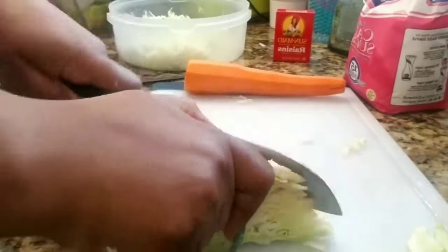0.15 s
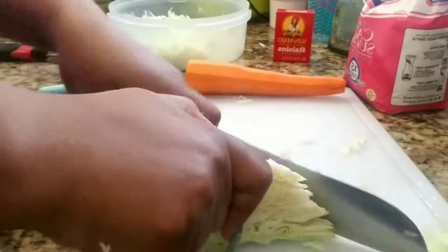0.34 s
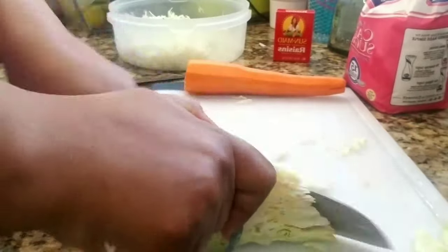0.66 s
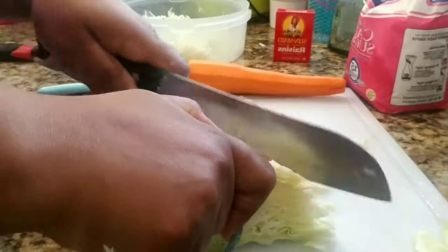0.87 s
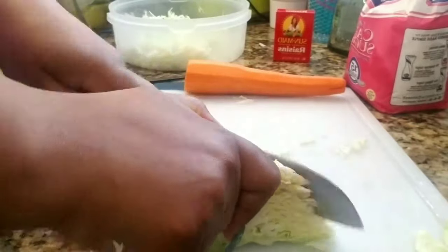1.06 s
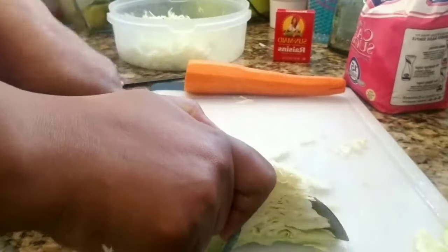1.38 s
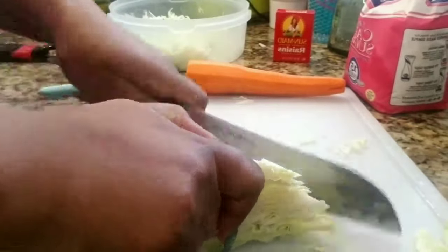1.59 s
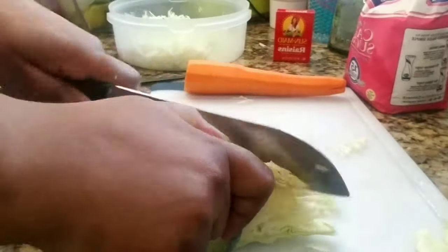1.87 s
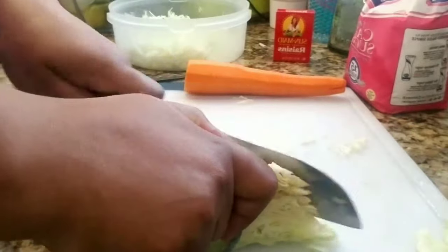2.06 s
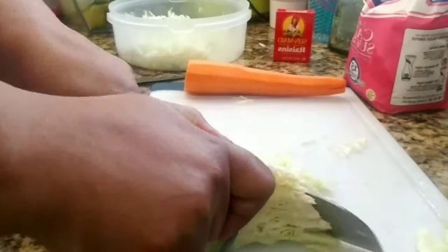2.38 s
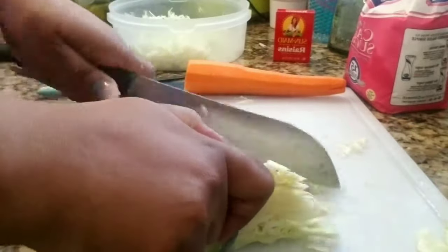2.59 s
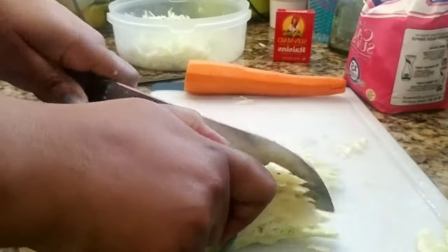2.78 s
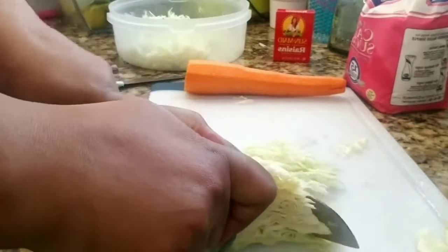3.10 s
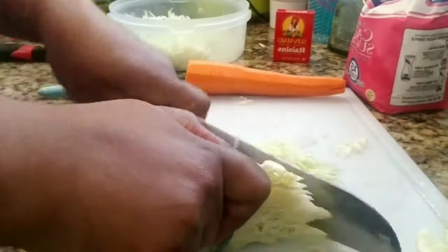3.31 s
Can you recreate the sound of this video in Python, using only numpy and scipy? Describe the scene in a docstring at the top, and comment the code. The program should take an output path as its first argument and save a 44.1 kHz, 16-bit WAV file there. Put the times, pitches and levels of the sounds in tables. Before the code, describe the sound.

Close stereo pickup of a knife cutting cabbage on a plastic board: crisp chops, soft leafy rustles and tiny snaps, then a strong crunching chop and smaller cuts, with short lively room reflections.

```python
"""Knife shredding cabbage

A large knife shreds cabbage on a plastic board in a small kitchen, heard from close by as an earlier chop dies away.
Each stroke crunches as a swell of tiny cell bursts, modelled as random clicks ringing at many pitches.
Ribs snap as short decaying noise; the edge chops the board, striking its modes, or scuffs it in runs of slips.
An appliance hums low over a soft rumble of filtered noise, and echoes, scatter and a tail make the room."""
import sys
import numpy as np
from scipy import signal
from scipy.fft import rfft, irfft, next_fast_len
from scipy.io import wavfile

SR = 44100
rng = np.random.default_rng(int(sys.argv[2]) if len(sys.argv) > 2 else 0)


def log_audio(samples):
    """Write samples as a 16-bit WAV file to the path given in sys.argv[1]."""
    # one column per channel
    frames = np.atleast_2d(samples).T
    # limit to full scale, then quantise
    limited = np.clip(frames, -1, 1)
    pcm = np.round(limited * 32767).astype(np.int16)
    wavfile.write(sys.argv[1], SR, pcm)


N = 152145
T = np.arange(N) / SR


def from_db(db):
    """Decibels to gain."""
    return 10 ** (np.asarray(db) / 20)


def rms_one(x):
    """Scale to unit rms."""
    return x / np.sqrt(np.mean(x ** 2) + 1e-20)


def at_hz(points, hz, axis=1):
    """Read a table column on a log-frequency axis."""
    points = np.array(points)
    return np.interp(np.log(hz + 1), np.log(points[:, 0]), points[:, axis])


def colour(x, gain):
    """Filter by a gain given as a function of frequency."""
    size = next_fast_len(2 * x.shape[-1])
    spectrum = rfft(x, size) * gain(np.fft.rfftfreq(size, 1 / SR))
    return irfft(spectrum, size)[..., :x.shape[-1]]


def ring(x, hz, t60_s):
    """A two-pole mode: a unit click sets it ringing at a height of about 1."""
    radius = from_db(-60 / (t60_s * SR))
    angle = 2 * np.pi * hz / SR
    poles = [1, -2 * radius * np.cos(angle), radius * radius]
    return signal.lfilter([.5, 0, -.5], poles, x + 1e-18)


def resonance(x, hz, width_hz):
    """One resonance of a given width; a wider one dies sooner."""
    return ring(x, hz, np.log(1000) / (np.pi * width_hz))


MODE_SPREAD_DB = 0.5  # each blow lands on another spot of the board


def modes(x, table):
    """A body's modes in parallel, signs alternating, each struck with a strength of its own."""
    out = np.zeros(N)
    for k, (hz, db, t60_s) in enumerate(table):
        strength = from_db(db + MODE_SPREAD_DB * rng.standard_normal())
        out += (-1) ** k * strength * ring(x, hz, t60_s)
    return out


GRAIN_SPREAD_DB = 4


def grains(per_s):
    """Random clicks of uneven size and either sign."""
    sizes = from_db(GRAIN_SPREAD_DB * np.minimum(rng.exponential(1, N), 4))
    return (rng.random(N) < per_s / SR) * sizes * rng.choice([-1, 1], N)


SWELL_SHAPE, FADE_SHAPE = 1.51, 1.83  # exponents


def swell(peak_s, rise_s, fall_s):
    """An envelope that is 20 dB down at rise_s before and at fall_s after its peak."""
    before = np.maximum((peak_s - T) / rise_s, 0) ** SWELL_SHAPE
    after = np.maximum((T - peak_s) / fall_s, 0) ** FADE_SHAPE
    return from_db(-20 * np.minimum(before + after, 10))


def waver(per_s):
    """Gaussian values of spread 1, per_s a second, joined by straight lines."""
    return np.interp(T * per_s, np.arange(N), rng.standard_normal(N))


def widen(pair, side_db):
    """Two signals as middle and side, total power kept."""
    side = from_db(side_db)
    return (pair[0] + side * pair[1] * np.array([[1], [-1]])) / np.hypot(1, side)


# Blade passes through leaves; the first row is the dying tail of an earlier chop.
# Each row: peak in s, swell in s, fade in s, relative level in dB,
# boost below BODY_BELOW_HZ in dB, boost above SIZZLE_ABOVE_HZ in dB.
SWELLS = [(0, .02, 0.13, -50.5, 7.5, -18), (0.233, 0.051, 0.03, -40, 1, 0.5),
          (0.283, 0.03, 0.012, -35, 3.5, -8), (0.609, 0.03, 0.01, -52, 1.5, -2),
          (0.673, 0.057, 0.15, -45.5, 4, 0.5), (1.119, .08, 0.021, -51, 2, 1.5),
          (1.2, 0.052, 0.052, -40.5, 2.5, 0), (1.238, 0.02, 0.015, -41, 8.5, 0),
          (1.492, 0.058, 0.046, -44.5, 3.5, 0.5), (1.608, 0.046, 0.034, -53, 4.5, -0.5),
          (1.874, 0.038, 0.027, -63, 0, -2), (1.997, 0.045, .05, -36, 5, -0.5),
          (2.05, 0.1, 0.047, -36.5, 4.5, 0.5), (2.172, 0.067, 0.093, -42.5, -1, 2),
          (2.272, 0.037, 0.049, -29, 2.5, -1.5), (2.311, 0.055, 0.06, -22, 2.5, -1.5),
          (2.348, 0.044, 0.053, -26, 11, -3.5), (2.5, 0.21, 0.12, -49.5, 12, -4),
          (2.584, 0.023, 0.025, -28.5, 6.5, -2), (2.888, 0.059, 0.065, -43, 5.5, 0.5),
          (2.969, 0.067, 0.049, -30, 3.5, -1.5), (3.1, 0.15, 0.085, -49.5, 0.5, 0),
          (3.225, 0.061, 0.032, -29.5, 2, -2), (3.279, 0.043, 0.056, -44, 6.5, 1.5)]
# Crunch spectrum. Each row: frequency in Hz, relative density in dB per Hz.
CRUNCH_SPECTRUM = [(200, -0.5), (500, -15.5), (850, -10), (1300, -6), (2500, -3.5), (4000, 3), (5800, -1.5),
                   (8500, -10.5), (12500, -1), (15000, -29)]
CRUNCH_DB, BODY_BELOW_HZ, SIZZLE_ABOVE_HZ = -1, 2000, 7500
BURSTS_PER_S, BURST_T60_CYCLES = 10000, 10.8  # bursts over all pitches
CRUNCH_PAN_DB, BURST_PAN_DB = -2, 12  # left minus right: mean, spread
LEAVES_PER_S, LEAF_SPREAD_DB = 200, 2
PATCH_PER_S, PATCH_DB = 40, 0.5  # each pitch comes and goes as the blade meets other veins


def crunch():
    """Cells burst under the blade as ticks, each with a pitch and place, clumped by leaf; the first
    swell lends the same ticks to an earlier chop's tail."""
    swell_powers = np.array([from_db(db) * swell(s, rise_s, fall_s)
                             for s, rise_s, fall_s, db, _, _ in SWELLS]) ** 2
    body_db, sizzle_db = np.array(SWELLS)[:, -2:].T
    pitches_hz = np.geomspace(300, 14500, 26)
    shares = from_db(at_hz(CRUNCH_SPECTRUM, pitches_hz)) * np.sqrt(pitches_hz)  # bands widen with pitch
    shares = shares / np.linalg.norm(shares)
    # half the bursts spread evenly over the pitches, half in proportion to pitch
    rates = BURSTS_PER_S / 2 * (pitches_hz / pitches_hz.sum() + 1 / len(pitches_hz))
    leaves = from_db(LEAF_SPREAD_DB * waver(LEAVES_PER_S))
    pan_db = CRUNCH_PAN_DB + BURST_PAN_DB * rng.standard_normal(N)
    places = from_db(pan_db * np.array([[.5], [-.5]]))
    places = places / np.linalg.norm(places, axis=0)
    out = np.zeros((2, N))
    for hz, share, per_s in zip(pitches_hz, shares, rates):
        patches = from_db(PATCH_DB * waver(PATCH_PER_S))
        ticks = ring(grains(per_s) * leaves * places * patches, hz, BURST_T60_CYCLES / hz)
        tone_db = body_db * (hz < BODY_BELOW_HZ) + sizzle_db * (hz > SIZZLE_ABOVE_HZ)
        envelope = np.sqrt(from_db(2 * tone_db) @ swell_powers)  # swells add in power
        out += share * rms_one(ticks) * envelope
    return from_db(CRUNCH_DB) * out


# Background course. Each row: time in s, hum level in dB, relative rumble level in dB.
BACKGROUND_LEVELS = [(0, -57.5, -58), (.2, -58, -68), (.29, -56, -62), (.4, -60.5, -69.5), (.7, -60, -70.5),
                     (0.801, -78.5, -70), (1.0, -83.5, -75.5), (1.399, -75, -71.5), (1.849, -82, -75.5),
                     (1.968, -59.5, -71.5), (2.1, -50, -59.5), (2.32, -50.5, -52), (2.5, -48.5, -56.5),
                     (2.7, -52, -60.5), (3.15, -53.5, -63), (3.45, -55, -61.5)]
# Appliance hum partials. Each row: frequency in Hz, relative level in dB.
HUM_PARTIALS = [(90, 0.5), (119, -4)]
# Rumble spectrum. Each row: frequency in Hz, relative density in dB per Hz.
RUMBLE_SPECTRUM = [(25, -20), (60, -6.5), (130, -0.5), (200, -2), (290, 2.5), (420, -6), (600, -15),
                   (1500, -20.5), (5000, -23), (15000, -42.5)]
RUMBLE_DB, HUM_SIDE_DB, RUMBLE_SIDE_DB = 7.5, -18, -6.5
HUM_WAVER_PER_S, HUM_WAVER_DB, HUM_WAVER_RAD = 18, 3.2, 1


def hum(phase_rad):
    """Appliance partials as sines whose levels and phases waver."""
    out = np.zeros(N)
    for hz, db in HUM_PARTIALS:
        level = from_db(db + HUM_WAVER_DB * waver(HUM_WAVER_PER_S))
        phase = 2 * np.pi * hz * T + HUM_WAVER_RAD * waver(HUM_WAVER_PER_S) + phase_rad
        out += level * np.sqrt(2) * np.sin(phase)
    return out


def background():
    """A wavering low hum over a rumble of coloured noise; both sink for a while in the middle."""
    s, hum_db, rumble_db = np.transpose(BACKGROUND_LEVELS)
    hum_pair = [hum(0), hum(np.pi / 2)]
    rumble_pair = rms_one(colour(rng.standard_normal((2, N)), lambda f: from_db(at_hz(RUMBLE_SPECTRUM, f))))
    hum_gain = from_db(np.interp(T, s, hum_db))
    rumble_gain = from_db(RUMBLE_DB + np.interp(T, s, rumble_db))
    return widen(hum_pair, HUM_SIDE_DB) * hum_gain + widen(rumble_pair, RUMBLE_SIDE_DB) * rumble_gain


# Single ribs break. Each row: start in s, relative level in dB, pitch in Hz.
SNAPS = [(.132, -29.5, 5630), (0.141, -30, 5640), (.173, -31, 5740), (0.209, -31, 5940), (0.552, -40, 6130),
         (.652, -27.5, 3420), (1.011, -37, 6000), (1.202, -24.5, 4000), (1.232, -26, 4000),
         (1.249, -25.5, 4000), (1.456, -40, 5000), (1.641, -39.5, 4340), (1.81, -42.5, 4940),
         (2.18, -14.5, 6940), (2.721, -30.5, 6200), (3.179, -21.5, 5300), (3.268, -33, 3970),
         (3.3, -16.5, 12200), (3.409, -29.5, 4800)]
SNAP_DB, SNAP_DECAY_S, SNAP_WIDTH_HZ = -9, 0.00082, 5440


def snaps():
    """A rib breaks with one bright tick: decaying noise through two broad resonances."""
    out = np.zeros(N)
    for s, db, hz in SNAPS:
        decay = (T >= s) * np.exp(-np.minimum(abs(T - s) / SNAP_DECAY_S, 20))
        tear = from_db(db + SNAP_DB) * decay * rng.standard_normal(N)
        out += resonance(resonance(tear, hz, SNAP_WIDTH_HZ), hz, 2 * SNAP_WIDTH_HZ)
    return out


# Edge hits the board. Each row: start in s, strength in dB, contact lowpass corner in Hz,
# relative ring level in dB, relative thump level in dB.
CHOPS = [(0.2913, 0.5, 6900, 0, -12.5), (.735, 0, 11800, -0.5, -13), (2.361, 3.5, 2920, 2.5, -2),
         (2.3675, -6, 1500, -7, -5), (3.235, -16.5, 2170, 6.5, 4)]
# First crack of a chop. Each row: frequency in Hz, relative level in dB, t60 in s.
CRACK = [(602, -10, 0.0022), (1450, -4, 0.0037), (2260, -4, 0.0028), (3660, -2.5, 0.0015),
         (4910, -2.5, 0.001), (7500, -9, 0.001), (10400, -13.5, .002)]
# Board and blade ringing together. Each row: frequency in Hz, relative level in dB, t60 in s.
BOARD = [(342.7, -8, 0.19), (600, -6.5, 0.1), (786, -0.5, 0.089), (908, -1, 0.15), (1027, 2, 0.095),
         (1105, -2.5, .08), (1300, -5.5, .07), (1330, 0, .09), (1558, -1, 0.19), (1880, 7, 0.067),
         (2140, -6, 0.094), (2190, -0.5, .07), (2520, -7, 0.085), (3740, 6.5, .08), (4470, -11.5, .07)]
# Counter under the board. Each row: frequency in Hz, relative level in dB, t60 in s.
COUNTER = [(105, -30.5, 0.01), (205, -20, 0.01)]
CRACK_DB, RING_DB = 2, -34


def chops():
    """The edge lands: a sharp crack, the ring of board and blade, and a thump in the counter."""
    out = np.zeros(N)
    for s, db, bright_hz, ring_db, thump_db in CHOPS:
        blow = np.zeros(N)
        blow[int(s * SR)] = from_db(db)
        pole = np.exp(-2 * np.pi * bright_hz / SR)
        contact = signal.lfilter([(1 - pole) ** 2], [1, -2 * pole, pole ** 2], blow + 1e-18)
        crack = sum(from_db(level_db) * ring(contact, hz, t60_s) for hz, level_db, t60_s in CRACK)
        thump = sum(from_db(level_db) * ring(blow, hz, t60_s) for hz, level_db, t60_s in COUNTER)
        out += from_db(CRACK_DB) * crack
        out += from_db(RING_DB + ring_db) * modes(contact, BOARD)
        out += from_db(thump_db) * thump
    return -out


# Edge scuffs the board. Each row: peak in s, rise and fall each in s, relative level in dB, pitch in Hz.
SCUFFS = [(1.2, 0.0088, -51, 790), (1.252, 0.0041, -40, 1110), (1.39, 0.0495, -57, 1410),
          (1.512, 0.013, -43.5, 900), (1.642, 0.012, -48.5, 1390), (2.368, 0.025, -20, 810),
          (2.577, 0.014, -29.5, 1390), (3.24, 0.029, -35.5, 790), (3.401, 0.01, -38.5, 1220)]
SCUFF_DB, SLIPS_PER_S, SCUFF_WIDTH_HZ = -1, 1800, 575
SCUFF_RING_DB = -7  # relative to the scuffs' rms


def rub(s, length_s, db, hz):
    """A short run of tiny slips through two resonances at one pitch."""
    slips = resonance(resonance(grains(SLIPS_PER_S), hz, SCUFF_WIDTH_HZ), hz, 2 * SCUFF_WIDTH_HZ)
    return from_db(db) * rms_one(slips) * swell(s, length_s, length_s)


def scuffs():
    """The edge drags briefly on the plastic and sets the board ringing."""
    out = from_db(SCUFF_DB) * sum(rub(*row) for row in SCUFFS)
    return out + from_db(SCUFF_RING_DB) * out.std() * rms_one(modes(out, BOARD))


# Room by band. Each row: frequency in Hz, relative early scatter in dB, relative late tail in dB,
# tail t60 in s.
KITCHEN = [(150, -3.5, -22.5, .5), (487, 1, -3.5, 0.4), (1340, -5, -7, 0.37), (3700, 3.5, -7, 0.41),
           (7600, -3, -4.5, 0.27), (14000, 6.5, -10.5, 0.31)]
# Reflections off counter and packets. Each row: delay in s, left level in dB, right level in dB.
ECHOES = [(.0076, -16, -19), (0.016, -15.5, -29), (0.0011, -35.5, -12.5)]
# Stereo balance. Each row: frequency in Hz, left minus right in dB.
BALANCE = [(200, -6.5), (500, 2), (1300, 5.5), (2500, 1), (4500, 6), (9000, -.5), (15000, 1)]
SCATTER_T60_S, SCATTER_ONSET_S, ROOM_SIDE_DB = 0.084, 0.00033, 3


def kitchen(x):
    """Direct sound, near echoes, dense scatter off the counter's clutter, and the room's tail."""
    t = T[:SR * 2 // 3]
    response = np.zeros((2, len(t)))
    noise = widen(rng.standard_normal((2, len(t))), ROOM_SIDE_DB)
    for hz in 60 * 2 ** np.arange(9):  # overlapping bands, an octave apart
        band = colour(noise, lambda f: np.clip(1 - abs(np.log2((f + 1) / hz)), 0, 1))
        scatter = at_hz(KITCHEN, hz), SCATTER_T60_S
        tail = at_hz(KITCHEN, hz, axis=2), at_hz(KITCHEN, hz, axis=3)
        for db, t60_s in (scatter, tail):
            same_energy = np.sqrt(np.log(1000) / (t60_s * SR))  # whatever the t60
            response += band * from_db(db - 60 * t / t60_s) * same_energy
    response *= 1 - np.exp(-t / SCATTER_ONSET_S)
    response[:, 0] += 1  # direct sound
    for delay_s, left_db, right_db in ECHOES:
        response[:, int(delay_s * SR)] += from_db([left_db, right_db])
    heard = signal.fftconvolve(x, response, axes=1)[:, :N]
    return colour(heard, lambda f: from_db(at_hz(BALANCE, f) * np.array([[.5], [-.5]]))) / np.sqrt(2)


def scene():
    """The knife work in the kitchen, over the background."""
    return kitchen(crunch() + snaps() + chops() + scuffs()) + background()


CEILING, CUTOFF_HZ = .8, 14700


def record(dry):
    """The hardest peaks are rounded by a tanh and the top is cut by a steep lowpass."""
    rounded = CEILING * np.tanh(dry / CEILING)
    lowpass = signal.ellip(10, .1, 80, CUTOFF_HZ, fs=SR, output="sos")
    return signal.sosfilt(lowpass, rounded)


dry = scene()
out = record(dry)
log_audio(out)
```